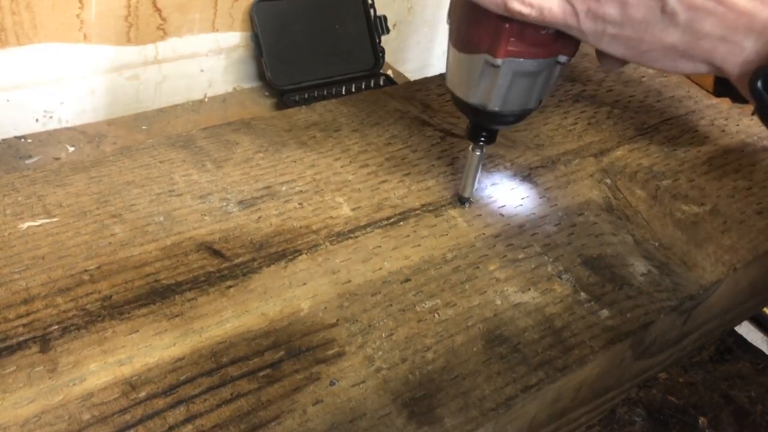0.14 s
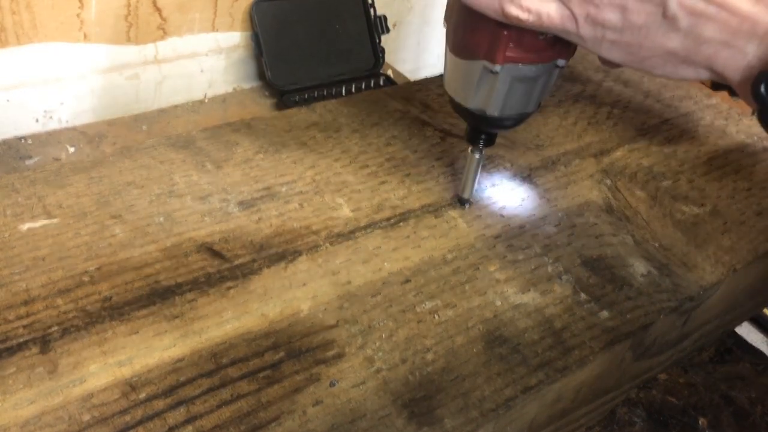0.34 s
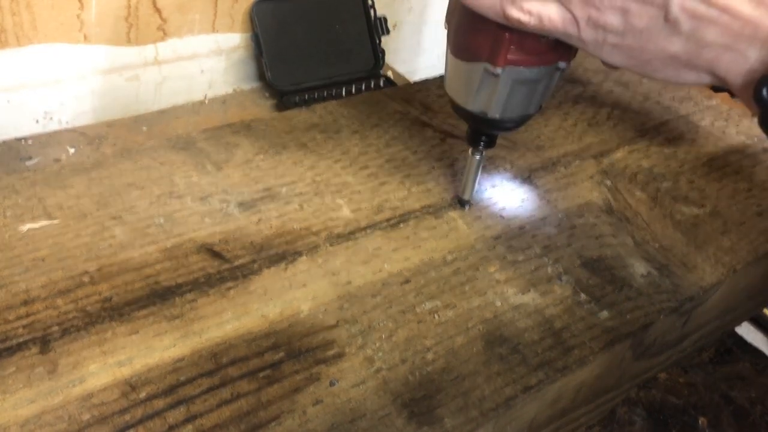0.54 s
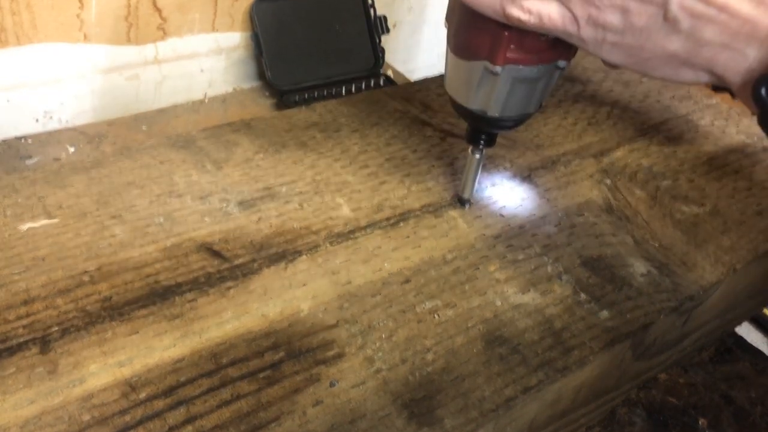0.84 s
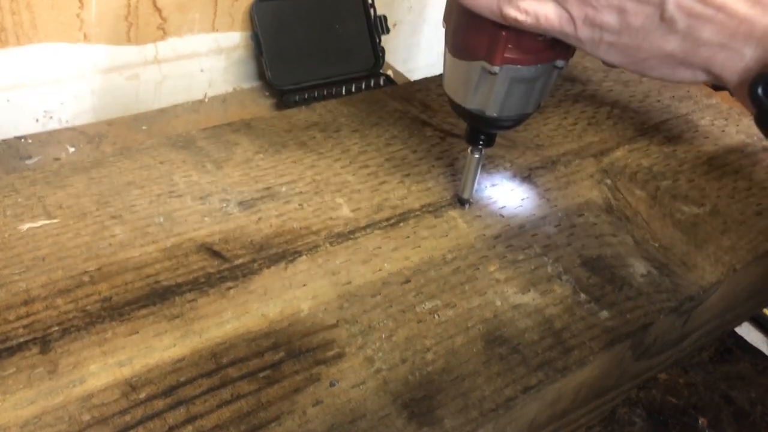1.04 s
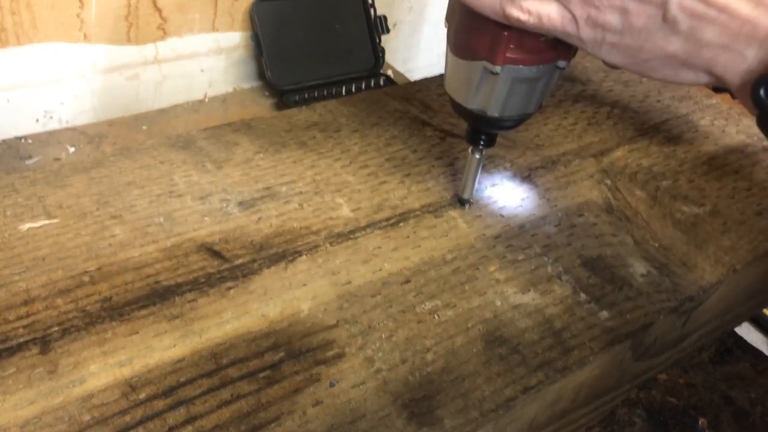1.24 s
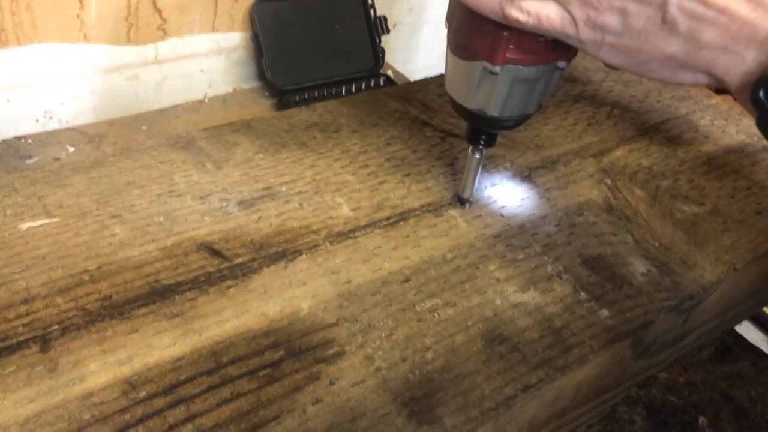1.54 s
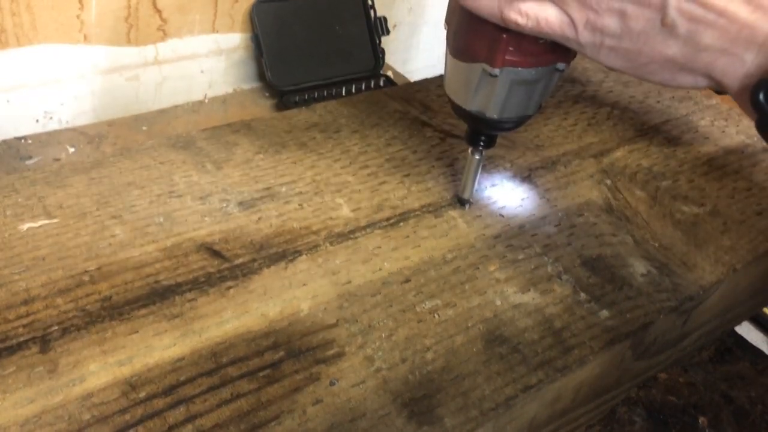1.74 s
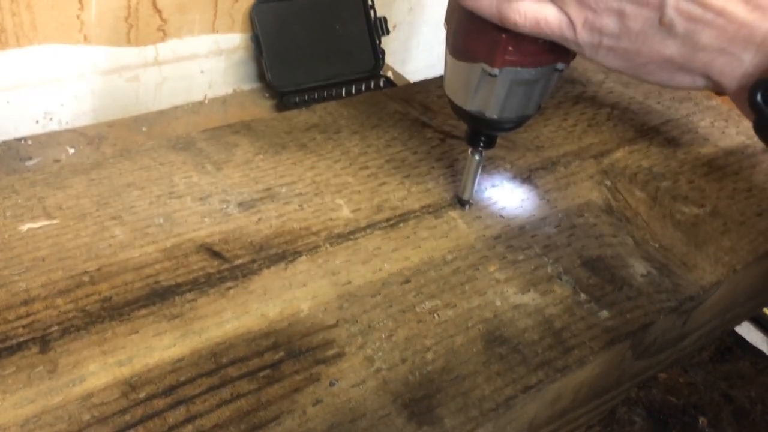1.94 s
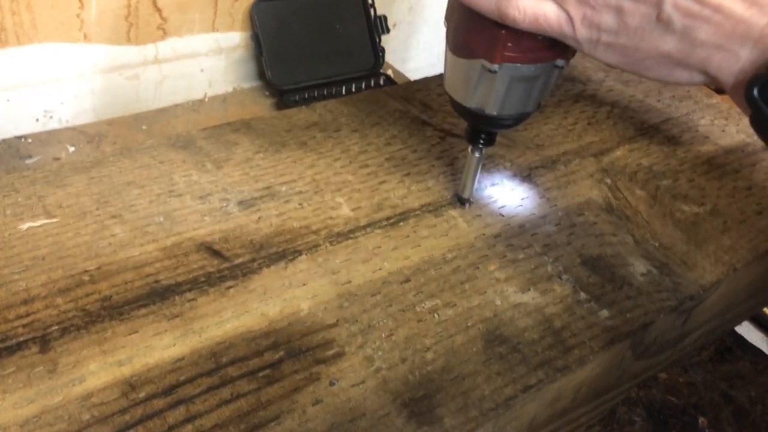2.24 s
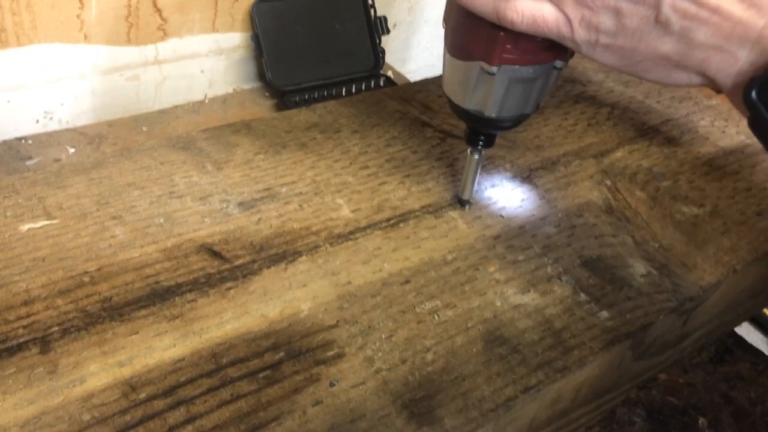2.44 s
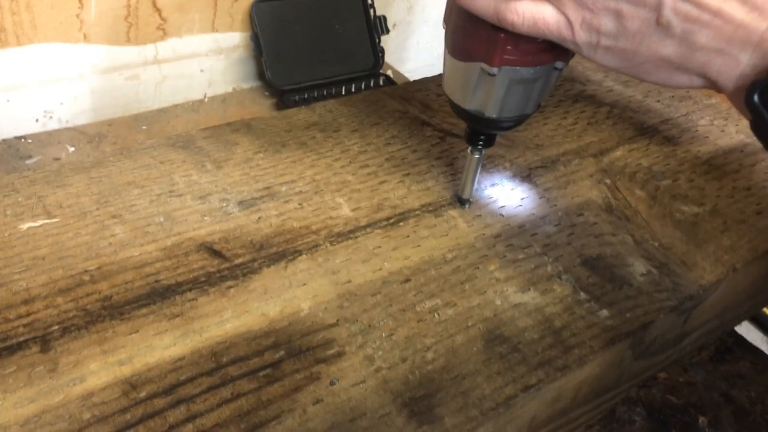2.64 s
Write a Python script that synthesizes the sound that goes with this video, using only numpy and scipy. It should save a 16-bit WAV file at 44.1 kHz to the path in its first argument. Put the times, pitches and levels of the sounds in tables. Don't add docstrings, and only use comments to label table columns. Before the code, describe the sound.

A cordless driver, close and mono: small trigger ticks, a quick spin-up with metallic clinks and hard rapid knocks on a wooden board, then a steadier gritty motor whine in a small workshop.

```python
import sys
import numpy as np
from scipy import signal
from scipy.fft import rfft, irfft, next_fast_len
from scipy.io import wavfile
from scipy.ndimage import uniform_filter1d, map_coordinates

SR = 44100
rng = np.random.default_rng(int(sys.argv[2]) if len(sys.argv) > 2 else 0)


def attenuation_scalar(level_db):
    decades = np.asarray(level_db, float) / 20
    return 10 ** decades


def digitize_waveform(pressure):
    field = np.atleast_2d(pressure).T
    bounded = np.clip(field, -1, 1)
    quanta = np.round(bounded * 32767).astype(np.int16)
    wavfile.write(sys.argv[1], SR, quanta)


N = 123479
TIME = np.arange(N) / SR
SEATED_S = 0.66
TEETH = 45


def unit(x):
    return x / np.sqrt(np.mean(x ** 2) + 1e-20)


def wobble(rate):
    return map_coordinates(rng.standard_normal(N // 8), [TIME * rate])


def filtered(x, response):
    m = next_fast_len(N + SR // 2)
    return irfft(rfft(x, m) * response(np.fft.rfftfreq(m, 1 / SR)), m)[:N]


def body(peaks, flip=-1):
    def response(f):
        total = 0
        for k, (center, width, db) in enumerate(peaks):
            damping = 1j * f * width
            total = total + flip ** k * attenuation_scalar(db) * damping / (center ** 2 - f * f + damping)
        return total
    return response


def noise(spectrum):
    f, db = np.transpose(spectrum)

    def colour(hz):
        return attenuation_scalar(np.interp(np.log(hz + 1), np.log(f), db, -120, -120))
    return unit(filtered(rng.standard_normal(N), colour))


def pulses(s, gain):
    at = np.clip(s * SR, 0, N - 2)
    i = at.astype(int)
    return np.bincount(i, gain * (1 - at + i), N) + np.bincount(i + 1, gain * (at - i), N)


def orders(turns, table):
    return sum(attenuation_scalar(db) * np.sqrt(2) * np.sin(2 * np.pi * k * turns + k * k) for k, db in table)


# (time [s], speed [turns/s])
SPINDLE_SPEED = [(.05, 4), (.105, 17), (.15, 22.67), (.2, 25.47), (.27, 26.05), (.45, 26.16), (.62, 26.39),
                 (.8, 25.06), (1.0, 25.43), (1.18, 24.76), (1.5, 24.44), (1.85, 24.67), (2.0, 23.9),
                 (2.2, 24.04), (2.3, 23.47), (2.55, 23.25), (2.68, 22.22), (2.8, 23.07)]
# (time [s], motor effort [dB], play of the bit [dB], mesh fundamental [dB],
# load on the third mesh tone [dB], load on the even one [dB])
HAND_ON_TOOL = [(0.049, -55, -61, -70, -41, -51), (0.06, -32.5, -21, -54, -25, -33),
                (0.11, -25, -20, -46, -31, -27), (0.15, -25, -10.5, -61, -30.5, -28),
                (0.26, -22, -7.5, -32, -44, -24.5), (0.41, -22, -13.5, -42, -39, -22),
                (0.42, -23, -11.5, -38, -51, -24.5), (0.68, -21, -18.5, -42, -34, -22.5),
                (0.79, -23, -21, -37, -32, -26), (1.12, -21, -22.5, -40, -38, -27.5),
                (1.24, -22.5, -19.5, -40, -38, -29.5), (1.54, -22.5, -23.5, -40, -29, -33),
                (1.66, -22, -22, -44, -43, -37), (1.81, -22, -22, -38, -35.5, -33),
                (1.97, -22, -25, -48, -27.5, -28), (2.25, -22.5, -25, -41, -27.5, -26.5),
                (2.5, -22.5, -25, -58, -28.5, -26), (2.63, -21.5, -28, -59, -25.5, -24),
                (2.75, -23.5, -25.5, -44, -27.5, -27), (2.8, -23, -27, -50, -26, -26.5)]


def controls():
    turns = np.cumsum(np.interp(TIME, *np.transpose(SPINDLE_SPEED))) / SR
    turns = turns - turns[round(0.504 * SR)]
    s, *levels = np.transpose(HAND_ON_TOOL)
    return [turns] + [attenuation_scalar(np.interp(TIME, s, db, -90)) for db in levels]


# (place [turns], level [dB])
BIT_CONTACTS = [(0, 8), (0.108, 4.5), (0.189, 5), (0.291, 10.5), (0.407, -1.5), (0.498, 10.5), (0.62, -5),
                (0.706, 4), (0.818, 4.5), (0.919, -2)]


def rattle(turns):
    slip_s, scatter_db, wander_db = 0.00003, 0.8, 1.5
    whole = np.arange(np.ceil(turns[0]), turns[-1])
    out = np.zeros(N)
    for place, db in BIT_CONTACTS:
        luck = rng.standard_normal((len(whole), 2))
        s = np.interp(whole + place, turns, TIME) + slip_s * luck[:, 0]
        drift_db = wander_db * np.interp(s, TIME, wobble(1.81))
        out += pulses(s, attenuation_scalar(db + scatter_db * luck[:, 1] + drift_db))
    return out


# (frequency [Hz], width [Hz], level [dB])
BOARD_MODES = [(69.6, 100, -9), (168, 46, -19), (279, 4.8, -19), (403.6, 28, -5.5), (460.5, 64, -5.5),
               (547, 80, -8), (732, 66, -7), (801, 9.8, -10), (886, 54, -11.5), (941, 22, -2),
               (1070, 74, -47), (1158, 69, -13.5), (1530, 80, -1), (1700, 14, -7)]
# (frequency [Hz], width [Hz], level [dB])
BIT_BOUNCE = [(839, 127, 0)]


def wood(x):
    direct_db, contact_hz = -17, 2420

    def response(f):
        push = attenuation_scalar(direct_db) + body(BIT_BOUNCE)(f)
        softness = 1 + 1j * f / contact_hz
        return body(BOARD_MODES, flip=1)(f) * push / softness
    return filtered(x, response)


# (multiple of the spindle, level [dB])
FLUTE_BUZZ = [(16, -0.5), (17, -4.5), (18, -4.5), (19, -13.5), (20, 6), (22, -14.5), (24, 0), (26, -2),
              (28, -19), (30, -7), (32, -4)]


def bit_on_board(turns, taps, play):
    rattle_db, chatter_db, loose_db = -4.5, -13, -8
    knocks = attenuation_scalar(rattle_db) * unit(wood(taps))
    chatter = attenuation_scalar(chatter_db) * unit(wood(rng.standard_normal(N)))
    buzz = wood(orders(turns, FLUTE_BUZZ))
    return play * attenuation_scalar(loose_db * (TIME < SEATED_S)) * (knocks + chatter + buzz)


# (time [s], peak level [dB])
HARD_BLOWS = [(0.067, -17), (0.087, -19.5), (0.108, -9), (0.133, -3), (0.155, 0), (0.176, -18),
              (0.197, -2), (0.236, -4), (0.273, -16), (0.313, -6.5), (0.352, -13), (0.39, -10),
              (0.428, -2), (0.466, -0.5), (0.504, -5.5), (0.541, -6.5), (0.561, -10.5), (0.58, -4),
              (0.618, -6), (0.636, -7), (0.656, -7.5), (0.813, -18), (0.853, -7), (0.892, -14),
              (0.931, -12), (0.972, -23), (1.09, -24), (1.171, -16), (1.212, -27), (1.258, -33),
              (1.66, -28), (1.741, -37), (2.129, -20), (2.171, -13), (2.321, -18), (2.405, -35),
              (2.449, -26), (2.546, -11), (2.588, -37), (2.631, -27)]
# (frequency [Hz], width [Hz], level [dB])
SHANK_FLEX = [(780, 380, 0)]
# (time [s], level [dB])
CHUCK_CLINKS = [
    (0.068, -49),
    (0.108, -30),
    (0.116, -46),
    (0.131, -18),
    (.154, -20.5),
    (0.177, -20),
    (0.195, -26),
    (.236, -43),
]
# (frequency [Hz], level [dB], decay t60 [s])
STEEL_RING = [(3300, -21, 0.023), (4800, -12, 0.028), (6400, -13, 0.08), (6640, 4, 0.01),
              (8000, -11, 0.022), (8260, -8, 0.013)]


def seating():
    ring_db, crack_db, crack_t60_s, blow_db = 1, -3.5, 0.019, 45.5
    t = TIME[:SR // 8]
    clinks = np.zeros(N + SR)
    for at, clink_db in CHUCK_CLINKS:
        ring = 0
        for hz, db, t60 in STEEL_RING:
            ring = ring + attenuation_scalar(db + rng.normal(0, 2.8) - 60 * t / t60) * np.sin(2 * np.pi * hz * t)
        crack = attenuation_scalar(crack_db - 60 * t / crack_t60_s) * rng.standard_normal(len(t))
        clinks[round(at * SR):][:len(t)] += attenuation_scalar(clink_db) * (attenuation_scalar(ring_db) * ring + crack)
    s, knock_db = np.transpose(HARD_BLOWS)
    blows = pulses(s, attenuation_scalar(knock_db + blow_db))
    return clinks[:N] + wood(filtered(blows, body(SHANK_FLEX)))


# (time [s], level [dB])
SINGING_LEVEL = [(.1, -35), (.15, -25), (.2, -22), (.25, -17), (.3, -20), (.4, -27), (.47, -18), (.54, -27),
                 (.64, -26), (.68, -19), (1.1, -28), (1.26, -22), (1.5, -25), (1.7, -23), (1.92, -29),
                 (2.2, -28), (2.56, -26), (2.8, -28)]
# (multiple of the spindle, level [dB])
SINGING_ORDERS = [(35, -6), (36, 0), (37, -4), (38, 0), (39, -2), (40, 0), (41, -2), (42, 0)]
# (frequency [Hz], width [Hz], level [dB])
MAIN_MODE = [(934, 26, 0)]


def singing(turns):
    ring = filtered(orders(turns, SINGING_ORDERS), lambda f: body(MAIN_MODE)(f) ** 2)
    power = np.abs(uniform_filter1d(ring ** 2, size=SR // 10))
    ring = ring / np.sqrt(power + 1e-9)
    return attenuation_scalar(-1 + np.interp(TIME, *np.transpose(SINGING_LEVEL), -90)) * ring


# (multiple of the mesh, level [dB], phase blur [rad])
MESH_TONES = [(2, 0, 0.51), (3, 3, 1)]
MESH_BEATS = [
    [(1, .75, .6), (2, .3, .6), (3, .1, .6)],
    [(1, .15, .5), (2, .45, .48), (3, .4, .02), (7, .3, 0)],
]
# (frequency [Hz], width [Hz], level [dB])
HOUSING_PRESSED = [(2010, 56, 0.5), (2314, 315, -2), (2625, 180, 0), (3085, 213, 3), (3594, 430, -0.5),
                   (3760, 86, 3.5), (4330, 175, -1), (4970, 350, -45)]
# (frequency [Hz], width [Hz], level [dB])
HOUSING_SLACK = [(1953, 91, -1), (2230, 260, -1), (2570, 230, 3), (3190, 170, -2), (3460, 150, 1.5),
                 (3730, 96, 3.5), (4340, 450, -8)]


def gears(turns, taps, odd, even):
    press_s, steadied, flutter_db = 0.08, 0.7, 1.8
    leak_db, grind_db, tap_db = -41.5, -4.5, -11
    swell_db, swell_peak = 2, 0.04
    pressed = np.clip((TIME - SEATED_S) / press_s + 0.5, 0, 1)
    odd = odd * attenuation_scalar(flutter_db * unit(wobble(45)))
    tones = np.zeros(N)
    for (k, db, blur), rows in zip(MESH_TONES, MESH_BEATS):
        load, unevenness = (odd, 1) if k % 2 else (even, 1 - steadied * pressed)
        beat = sum(depth * np.cos(2 * np.pi * n * (turns - peak)) for n, depth, peak in rows)
        tone = np.sin(2 * np.pi * k * TEETH * turns + blur * wobble(40))
        tones += load * attenuation_scalar(db) * (1 + unevenness * beat) * tone
    whine = filtered(tones, body(HOUSING_PRESSED)) + attenuation_scalar(leak_db) * tones
    swell = attenuation_scalar(swell_db * np.cos(4 * np.pi * (turns - swell_peak)))
    scrape = swell * rng.standard_normal(N)
    sharp_taps = taps - uniform_filter1d(taps, size=20)
    drive_in = attenuation_scalar(grind_db) * unit(scrape) + attenuation_scalar(tap_db - 0.5) * unit(sharp_taps)
    grind = pressed * filtered(drive_in, body(HOUSING_PRESSED))
    grind = grind + (1 - pressed) * filtered(drive_in, body(HOUSING_SLACK))
    bite = np.clip(TIME / 0.11, 0, 1) ** 4
    return bite * whine, attenuation_scalar(grind_db - 0.5) * unit(grind)


def mesh_fundamental(turns, level):
    return level * np.sqrt(2) * np.sin(2 * np.pi * TEETH * turns + 0.3 * wobble(14))


# (multiple of the spindle, level [dB])
DRIVE_HUM = [(2, -24), (3, -24), (4, 0), (5, -19), (6, -13), (7, -21), (8, -18), (9, -20), (10, -15),
             (14, -20), (15, -19)]
# (time [s], fourth order [Hz], its level [dB], level of the twelfth order [dB])
UNBALANCE = [(0.1, 94.7, -47, -61), (0.14, 91.6, -39, -55), (0.24, 104, -32, -45), (0.54, 104, -29, -42),
             (0.56, 104, -29, -50), (0.69, 104, -29, -39), (0.82, 101, -35, -46), (1.01, 101, -32, -49),
             (1.18, 98.4, -35, -42), (1.87, 98.1, -37, -44), (2.03, 95.5, -37, -53), (2.5, 92.7, -32, -52),
             (2.77, 87.2, -35, -52), (2.8, 84.9, -34, -49)]


def drive(turns):
    s, _, hum_db, twelfth_db = np.transpose(UNBALANCE)
    start = np.clip(TIME / s[0], 0, 1) ** 6
    hum = attenuation_scalar(np.interp(TIME, s, hum_db)) * orders(turns, DRIVE_HUM)
    twelfth = attenuation_scalar(np.interp(TIME, s, twelfth_db)) * orders(turns, [(12, 0)])
    return start * (hum + twelfth)


# (frequency [Hz], level [dB per Hz])
BRUSH_HISS = [(600, -48), (1000, -3.5), (1840, -10.5), (4300, -8.5), (5400, -9.5), (7000, -8), (9500, -9.5),
              (15700, -11.5)]


def hiss(turns):
    hiss_db, turn_db, grit_db = -2.5, 1.1, 2.5
    beat_db = turn_db * (np.cos(2 * np.pi * turns) + 0.81 * np.cos(4 * np.pi * turns))
    beat_db = beat_db + grit_db * unit(wobble(900)) / 2 + 1.01 * wobble(7.62)
    return attenuation_scalar(hiss_db) * unit(attenuation_scalar(beat_db) * noise(BRUSH_HISS))


# (frequency [Hz], level [dB per Hz])
FAN_AIR = [(8000, -37), (12500, 0), (15700, 3)]


def fan():
    fan_db, db_per_turn = -36.5, 1.5
    speed = np.interp(TIME, *np.transpose(SPINDLE_SPEED))
    return attenuation_scalar(fan_db + db_per_turn * (speed - 23.0) + wobble(9.6)) * noise(FAN_AIR)


def kick():
    start_s, kick_db, kick_hz, t60_s = 0.074, -33.5, 143, 0.13
    t = np.maximum(TIME - start_s, 0)
    return attenuation_scalar(kick_db - 60 * t / t60_s) * np.sin(2 * np.pi * kick_hz * t)


# (time [s], peak level [dB])
TRIGGER_TICKS = [
    (.007, -48),
    (0.019, -30),
    (0.031, -35),
    (0.042, -38),
    (.056, -46),
    (0.0656, -33),
]


def trigger():
    t = TIME[:SR // 20]
    tick = attenuation_scalar(-60 * t / 0.035) * np.diff(rng.standard_normal(len(t) + 1)) / 3
    s, db = np.transpose(TRIGGER_TICKS)
    return signal.fftconvolve(pulses(s, attenuation_scalar(db)), tick)[:N]


# (frequency [Hz], level [dB per Hz])
RUMBLE_NOISE = [(12, -58), (20, -9), (48, -30), (91, -32), (178, -12), (328, -8), (700, -4.5), (910, -95),
                (1540, -120)]


def rumble(effort):
    return effort * attenuation_scalar(-19) * noise(RUMBLE_NOISE)


def room(tool):
    room_db, t60_s = -10.5, 0.15
    tail = attenuation_scalar(-60 * TIME[:SR // 3] / t60_s) * rng.standard_normal(SR // 3)
    late = np.pad(tool, (200, 0))
    return attenuation_scalar(room_db) * signal.fftconvolve(late, tail / np.linalg.norm(tail))[:N]


# (frequency [Hz], level [dB per Hz])
ROOM_AIR = [(25, -27), (90, 13), (340, -12), (500, -3), (1300, -13), (4000, -14), (15700, -34)]


def air():
    return attenuation_scalar(-52.5) * noise(ROOM_AIR)


def scene():
    turns, effort, play, first, odd, even = controls()
    taps = rattle(turns)
    whine, grind = gears(turns, taps, odd, even)
    tool = bit_on_board(turns, taps, play) + seating() + singing(turns)
    tool = tool + whine + effort * (grind + hiss(turns))
    tool = tool + fan() + kick() + trigger()
    mono = tool + mesh_fundamental(turns, first) + drive(turns)
    mono = mono + rumble(effort) + room(tool) + air()
    top_hz = 15800
    return np.array([filtered(mono, lambda hz: hz < top_hz)] * 2)


def low_pass(x):
    return signal.sosfilt(signal.butter(12, 17090, fs=SR, output="sos"), x)


def record(dry):
    return low_pass(dry)


dry = scene()
out = record(dry)
digitize_waveform(out)
```